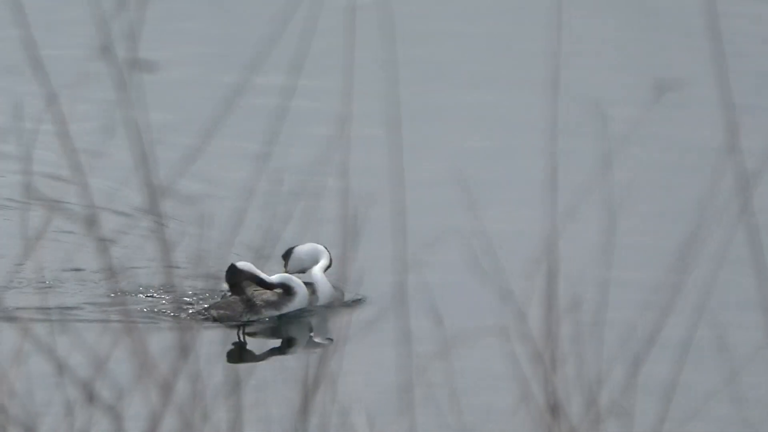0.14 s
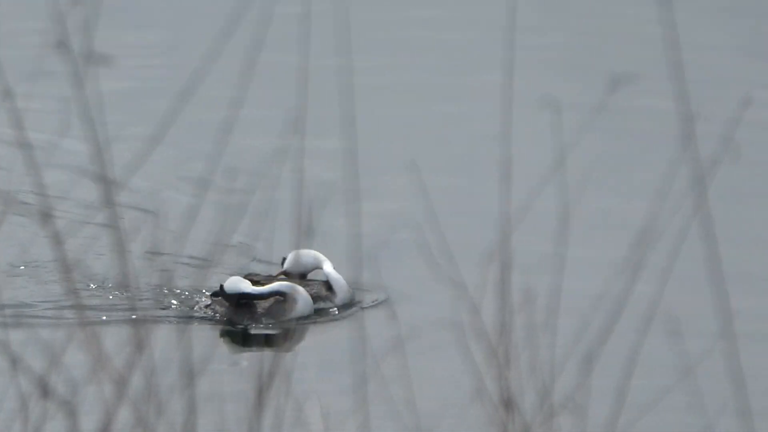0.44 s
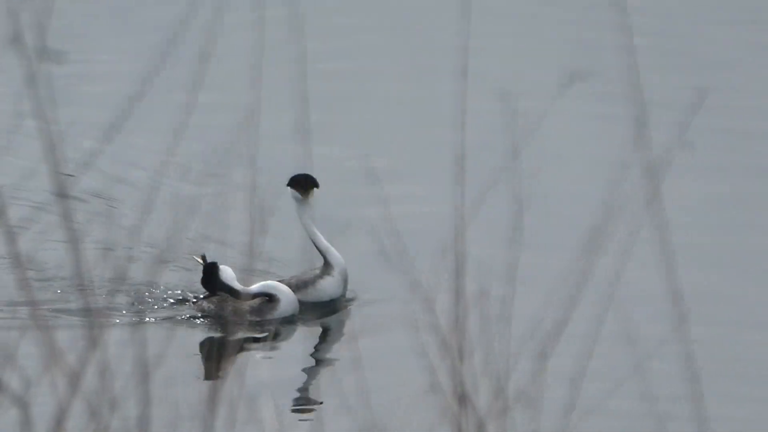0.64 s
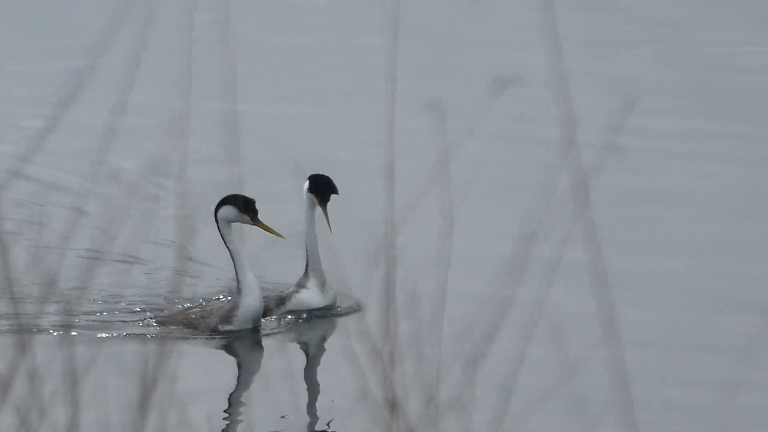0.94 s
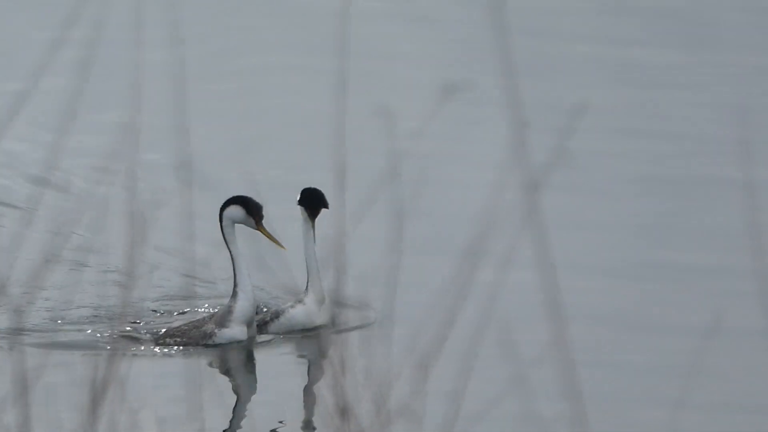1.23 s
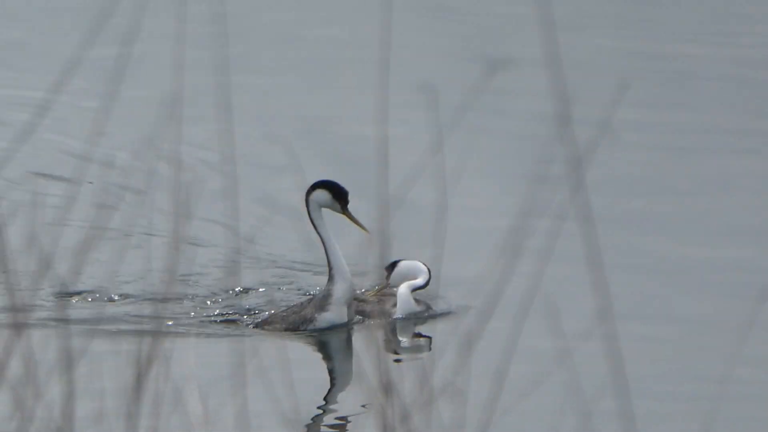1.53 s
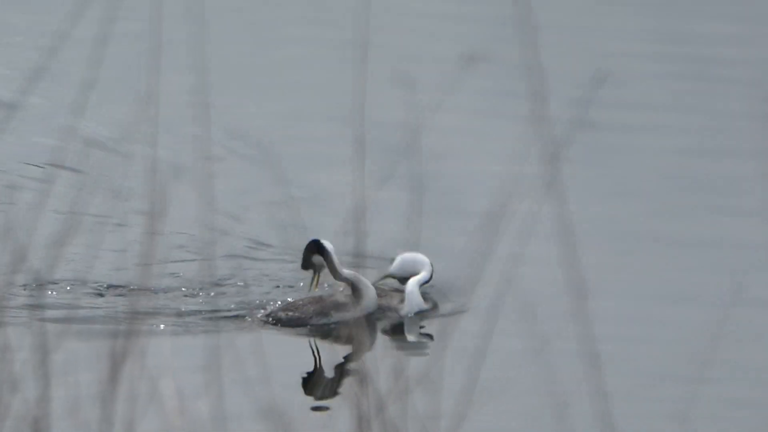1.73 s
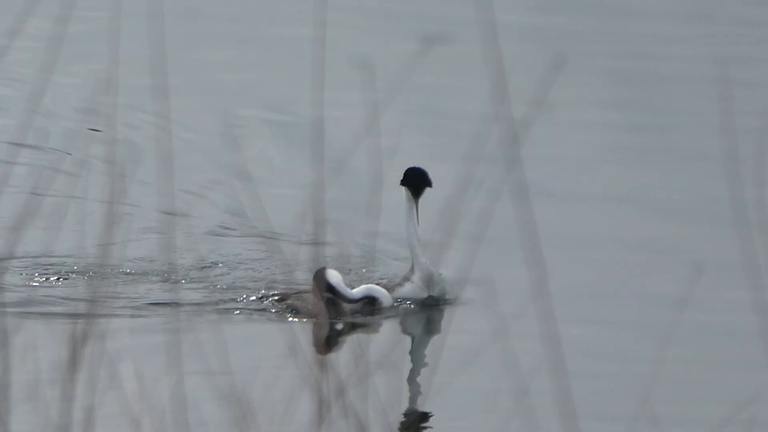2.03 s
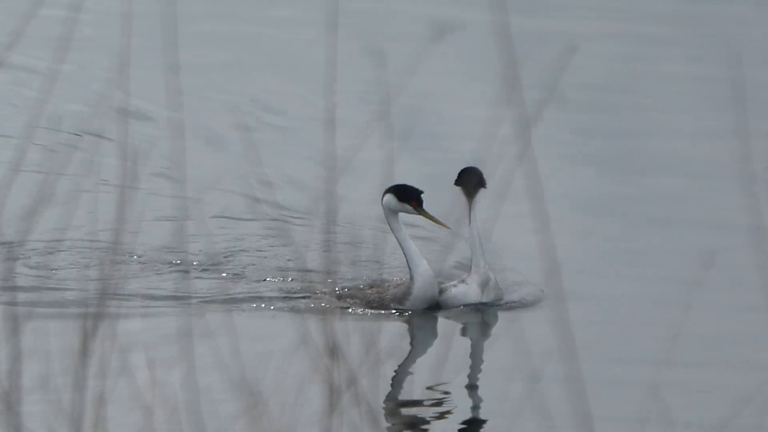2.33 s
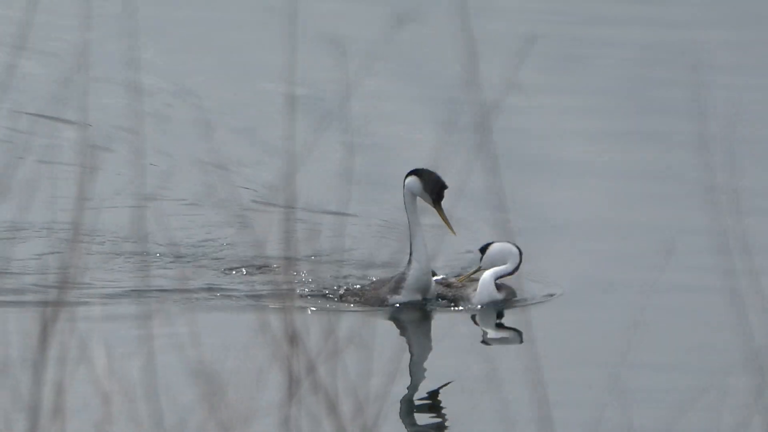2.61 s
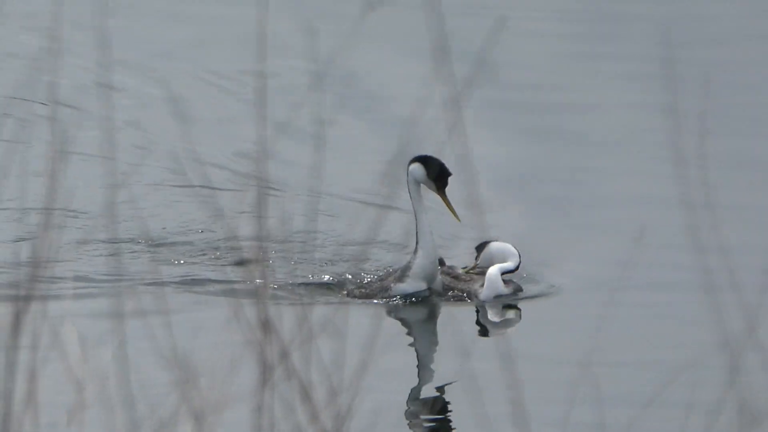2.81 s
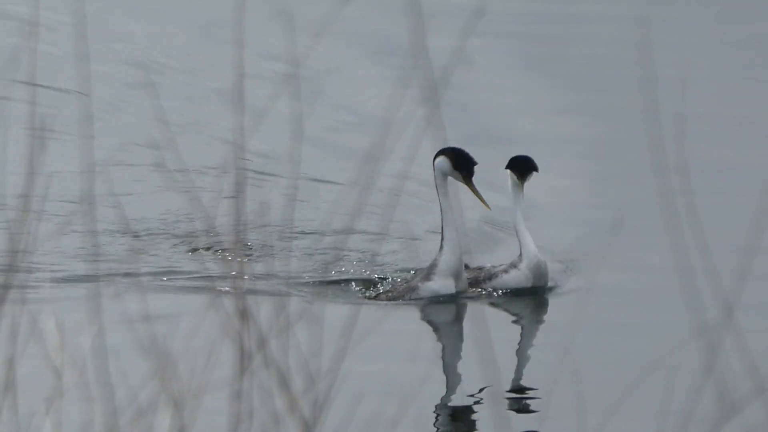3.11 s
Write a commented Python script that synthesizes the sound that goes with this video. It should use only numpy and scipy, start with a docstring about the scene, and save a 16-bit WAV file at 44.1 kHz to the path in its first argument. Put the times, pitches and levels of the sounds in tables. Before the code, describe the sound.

A grebe calls on a calm pond: dry ticks from 0.6 seconds quicken into a raspy, fluttering trill at 0.85, merging into a thin squeal until 1.4. More ticks follow around 1.5 and 2.7. Soft splashes come about twice a second, with sharp water slaps near 0.5 and 2.1. A distant rumble and faint hiss continue throughout, and a tiny far bird chirps twice around 2.8.

```python
"""Grebes courting on a calm pond.

A bird on the left ticks, speeds into a fluttering trill that merges into a thin squeal,
and ticks again. Its voice is a raspy whistle, shaped by the throat and echoed by the bank.
Soft splashy swishes come about twice a second, two with a sharp slap of water. Behind them
are a distant low rumble, faint open-air hiss and two chirps of a small far bird."""
import sys
import numpy as np
from scipy import signal
from scipy.fft import rfft, irfft
from scipy.io import wavfile

SR = 44100
rng = np.random.default_rng(int(sys.argv[2]) if len(sys.argv) > 2 else 0)


def to_wav(s):
    """Save 16-bit WAV."""
    ch = np.atleast_2d(s).T  # columns
    pcm = np.round(np.clip(ch, -1, 1) * 32767)  # PCM
    wavfile.write(sys.argv[1], SR, pcm.astype(np.int16))


N = 143766


def amp(db):
    """Decibels to gain."""
    return 10 ** (np.asarray(db) / 20)


def unit_rms(x):
    """Scales to rms 1."""
    return x / np.sqrt(np.mean(x ** 2) + 1e-20)


def curve_at(points, hz):
    """Interpolates (Hz, value) rows on a log-frequency axis."""
    point_hz, value = np.transpose(points)
    return np.interp(np.log(hz + 1), np.log(abs(point_hz) + 1), value)


def add(mix, start_s, sound):
    """Mixes a sound in at start_s."""
    part = mix[:, round(start_s * SR):][:, :sound.shape[1]]
    part += sound[:, :part.shape[1]]


def drift(size, cutoff_hz):
    """Low-passed random motion, rms about 1."""
    hz = np.fft.rfftfreq(size + 4096, 1 / SR)
    white = rfft(rng.standard_normal(size + 4096))
    return unit_rms(irfft(white * np.exp(-(hz / cutoff_hz) ** 2)))[:size]


# Each row: frequency in Hz, left-right correlation.
CORRELATION = [(60, 0.37), (130, 0.96), (290, 0.82), (640, 0.18), (1410, 0.034), (3100, 0.24), (6820, 0.47),
               (15000, 0.49)]
# Each row: frequency in Hz, left minus right in dB.
BALANCE = [(60, -1.5), (150, 0.5), (380, 1.5), (950, 2.0), (2380, 3), (5980, 0), (15000, -2.5)]


def outdoor_noise(spectrum, weight=lambda hz: 1):
    """Coloured stereo noise of rms 1, nearly mono in the upper bass."""
    hz = np.fft.rfftfreq(N, 1 / SR)
    left, independent = rfft(rng.standard_normal((2, N)))
    correlation = np.clip(curve_at(CORRELATION, hz), -1, 1)
    right = correlation * left + np.sqrt(1 - correlation ** 2) * independent
    lean_db = curve_at(BALANCE, hz) / 2
    pair = np.array([left * amp(lean_db), right * amp(-lean_db)])
    return unit_rms(irfft(pair * amp(curve_at(spectrum, hz)) * weight(hz), N))


# Each row: frequency in Hz, relative density in dB.
AIR_SPECTRUM = [(240, -23.5), (400, -5.5), (467, -8), (654, -6), (947, -12.5), (1020, -10.5), (1120, -14.5),
                (1310, -17), (1700, -19.5), (2170, -17), (2870, -30.5), (3340, -22), (4550, -30),
                (4980, -30), (10100, -34.5), (14600, -41), (15800, -49)]


def air(level_db=-50, swell_db=0.093):
    """Open-air hiss, almost steady."""
    return outdoor_noise(AIR_SPECTRUM) * amp(level_db + swell_db * drift(N, 13))


# Each row: frequency in Hz, relative density in dB.
RUMBLE_SPECTRUM = [(20, -56), (37, -46), (52, -28), (75, -16.5), (100, -12.5), (123, -4), (150, -1),
                   (170, 2), (209, -11.5), (240, -1.5), (267, 0), (306, -6), (341, -15), (391, -14.5),
                   (442, -22), (520, -28.5), (680, -33.5), (1140, -100)]
# Each row: time in seconds, low band in dB, upper band in dB.
RUMBLE_SWELLS = [(0, -44.5, -35), (.22, -43, -38), (.5, -44, -44), (0.751, -46, -44), (.9, -42.5, -48),
                 (1.15, -43, -41), (1.42, -41, -38), (1.55, -39.5, -44.5), (1.78, -46.5, -41.5),
                 (1.92, -41.5, -51), (2.2, -46, -48.5), (2.36, -46, -45.5), (2.65, -46, -49.5),
                 (2.98, -43.5, -47), (3.26, -47, -54)]


def rumble(crossover_hz=210):
    """A distant drone in two bands that swell separately."""
    def low_share(hz):
        return 1 / (1 + (hz / crossover_hz) ** 20)

    t = np.arange(N) / SR
    times, low_db, upper_db = np.transpose(RUMBLE_SWELLS)
    low = outdoor_noise(RUMBLE_SPECTRUM, lambda hz: np.sqrt(low_share(hz)))
    upper = outdoor_noise(RUMBLE_SPECTRUM, lambda hz: np.sqrt(1 - low_share(hz)))
    return low * amp(np.interp(t, times, low_db)) + upper * amp(np.interp(t, times, upper_db))


# Each row: start in seconds, length in seconds, first pitch in Hz, last pitch in Hz.
FAR_GLIDES = [(2.785, 0.056, 4570, 4040), (2.923, 0.048, 4200, 4580)]


def far_bird(level_db=-67):
    """A small distant bird whistles faint, pure glides."""
    out = np.zeros((2, N))
    for start_s, length_s, from_hz, to_hz in FAR_GLIDES:
        progress = np.arange(0, length_s, 1 / SR) / length_s
        glide = np.sin(2 * np.pi * np.cumsum(from_hz + (to_hz - from_hz) * progress) / SR)
        add(out, start_s, amp(level_db) * (np.sin(np.pi * progress) * glide)[None])
    return out


# Each row: peak time in seconds, half-width in seconds, level in dB, spray trim in dB.
SPLASHES = [(.458, 0.053, -46.5, -7), (1.029, 0.064, -55.5, -3), (1.549, 0.063, -51, -7),
            (2.057, 0.021, -45.5, -14), (2.098, 0.021, -46.5, -12), (2.648, 0.042, -43, -9),
            (3.165, 0.06, -51, -19)]
# Splash body and spray. Each row: frequency in Hz, relative density in dB.
BODY_SPECTRUM = [(200, -42), (600, 4), (1200, 2), (1800, 1), (2800, -17.5), (3900, -11.5), (6000, -51),
                 (16000, -64)]
SPRAY_SPECTRUM = [(2000, -21), (3300, -8), (4200, 3), (5500, 2.5), (7000, -35), (16000, -35)]
WATER_RIGHT_DB = -1.5


def swishes(graininess=0.33, spray_db=-10):
    """Grainy splashes swell and fade, each with more or less bright spray."""
    t, hz = np.arange(N) / SR, np.fft.rfftfreq(N, 1 / SR)
    grains = rfft(rng.standard_normal((2, N)) * np.exp(graininess * drift(N, 150)))
    body = unit_rms(irfft(grains * amp(curve_at(BODY_SPECTRUM, hz)), N))
    spray = unit_rms(irfft(grains * amp(curve_at(SPRAY_SPECTRUM, hz)), N))
    out = np.zeros((2, N))
    for peak_s, half_width_s, db, trim_db in SPLASHES:
        swell = np.exp(-abs((t - peak_s) / half_width_s) ** 2.6)
        out += amp(db) * swell * (body + amp(spray_db + trim_db) * spray)
    return out * amp([[0], [WATER_RIGHT_DB]])


def strike(t, rise_s):
    """Envelope that reaches 1 at rise_s and dies quickly."""
    return (t / rise_s * np.exp(1 - t / rise_s)) ** 2


# Each row: start in seconds, level in dB, pitch in Hz.
WATER_SLAPS = [(0.4742, -30, 1220), (2.0885, -31.5, 1250)]


def slaps(rise_s=0.00038):
    """Sharp slaps of water inside the swishes: knocks of a few cycles."""
    out, t = np.zeros((2, N)), np.arange(512) / SR
    for start_s, db, hz in WATER_SLAPS:
        knock = strike(t, rise_s) * np.sin(2 * np.pi * hz * t)
        add(out, start_s, amp([[db], [db + WATER_RIGHT_DB]]) * knock)
    return out


def bank_echo(call, level_db=-16, t60_s=0.32):
    """A faint, diffuse return from the reeds and the bank."""
    t = np.arange(SR // 2) / SR
    tail = rng.standard_normal((2, len(t))) * amp(-60 * t / t60_s)
    tail /= np.linalg.norm(tail[0])
    return amp(level_db) * signal.fftconvolve(call[:1], tail, axes=1)[:, :N]


# Each row: frequency in Hz, gain in dB.
THROAT_RESPONSE = [(1200, 8.5), (1800, -0.5), (2300, -0.5), (2580, 0.5), (2900, -9.5), (3150, -3),
                   (3450, 5.5), (3900, 3), (4300, 0.5), (4560, 0.5), (4900, 2), (5700, 3), (6400, -1),
                   (8000, -4)]


def throat(source, ring_hz=2420, ring_width_hz=310, ring_db=-9):
    """Two broad resonances with a deep valley between, and a narrow one that rings after each pulse."""
    ring = signal.lfilter(*signal.iirpeak(ring_hz, ring_hz / ring_width_hz, fs=SR), source)
    response = amp(curve_at(THROAT_RESPONSE, np.fft.rfftfreq(N, 1 / SR)))
    return irfft(rfft(source + amp(ring_db) * ring) * response, N)


# Each entry: multiple of the pitch.
PARTIAL_RATIOS = [1, 1.5, 2, 3]
# Each row: dB in the squeal, dB in chirps, dB in ticks, right-side offset in dB.
PARTIAL_GAINS = [(-1, 3, 3.5, -16), (-35, -34, -16.5, -18), (-15.5, -22, -9.5, -8), (-37, -31, -26, -12.5)]
IN_SQUEAL, IN_CHIRPS, IN_TICKS = range(3)


def voice(hz, envelope, column, overtone_db=0, split_db=0, rasp_db=-24, waver=0.0077):
    """The grebe's raspy whistle; split_db lifts the partial between the first two harmonics."""
    size = len(hz)
    phase = 2 * np.pi * np.cumsum(hz * (1 + waver * drift(size, 400))) / SR
    out = np.zeros((2, size))
    for ratio, (*gains_db, right_db) in zip(PARTIAL_RATIOS, PARTIAL_GAINS):
        rasp = 1 + amp(rasp_db) * (drift(size, 600) + 1j * drift(size, 600))
        db = gains_db[column] + overtone_db * (ratio > 1) + split_db * (ratio % 1 > 0)
        partial = (envelope * rasp * np.exp(1j * ratio * phase)).imag
        out += amp([[0], [right_db]]) * amp(db) * partial
    return out


def edges(t, fade_s=0.0021):
    """Linear fades at both ends."""
    return np.clip(np.minimum(t, t[-1] - t) / fade_s, 0, 1)


# Each row: start in seconds, source level in dB, pitch in Hz, overtone trim in dB.
GREBE_TICKS = [(0.603, -37, 1980, 2.5), (0.635, -36.5, 2110, 1), (0.649, -41, 2140, 2),
               (0.6725, -33.5, 2140, -1), (0.687, -35, 2200, -4), (0.726, -32, 2065, -0.5),
               (.742, -50, 2210, -3), (1.335, -47, 1850, 5), (1.403, -31.5, 2110, -1.5),
               (1.4422, -33.5, 2090, 3.5), (1.491, -38, 1835, 1), (1.495, -34, 2020, 1.5),
               (1.501, -32.5, 2190, 0), (2.682, -39.5, 2090, -16), (2.7306, -35, 2060, -18),
               (2.7403, -39.5, 2140, -15)]


def ticks(rise_s=0.0014, glide_per_s=10):
    """Dry single pulses of the voice, rising in pitch and rougher than the notes."""
    out, t = np.zeros((2, N)), np.arange(512) / SR
    for start_s, db, hz, overtone_db in GREBE_TICKS:
        pitch_hz = hz * (1 + glide_per_s * (t - rise_s))
        envelope = amp(db) * strike(t, rise_s)
        add(out, start_s, voice(pitch_hz, envelope, IN_TICKS, overtone_db, rasp_db=-13))
    return out


def flutter(size, rate_hz, jitter=0.14, first_pulse_s=0.0019, width_cycles=0.18, floor=0.035):
    """Complex envelope of pulses and weaker after-pulses; shifts every partial up by the pulse rate."""
    cycles = np.cumsum(rate_hz * (1 + jitter * drift(size, 114))) / SR - first_pulse_s * rate_hz
    pulses = np.exp(-(((cycles + 0.5) % 1 - 0.5) / width_cycles) ** 2)
    after_pulses = 0.33 * np.exp(-((cycles % 1 - 0.5) / width_cycles) ** 2)
    return (floor + pulses + after_pulses) * np.exp(2j * np.pi * cycles)


# Each row: start in seconds, length in seconds, source level in dB, base pitch in Hz,
# pulse rate in Hz, fraction by which the base pitch starts flat.
TRILL_CHIRPS = [(0.8487, 0.021, -26.5, 2165, 178, 0.0058), (0.893, 0.01, -26.5, 2145, 210, 0.12),
                (0.938, .015, -26.5, 2164, 173, 0.16), (0.964, 0.014, -31, 1920, 150, -0.09),
                (.9848, .014, -23, 2210, 160, 0.08), (1.013, .014, -35, 1890, 155, -.05),
                (1.0313, 0.022, -26, 2207, 148, 0.23), (1.062, .014, -38, 2040, 136, 0.024),
                (1.079, 0.016, -36.5, 2200, 210, 0), (1.1098, 0.0073, -26.5, 2130, 200, .1),
                (1.1195, 0.021, -27, 2245, 123, 0.14), (1.172, 0.04, -24, 2200, 175, .02),
                (1.2183, 0.041, -26.5, 2173, 141, 0.095), (1.266, .034, -28, 2190, 170, 0.043),
                (1.363, 0.018, -25, 2240, 164, .15), (2.909, 0.014, -37, 2020, 170, 0.054)]


def trill(swell_s=0.0072, swell_db_per_s=900, fade_db=8.5, scoop_s=0.00393, swing=0.015):
    """Fluttering chirps that swell, slide onto an unsteady pitch and fade."""
    out = np.zeros((2, N))
    for start_s, length_s, db, base_hz, rate_hz, scoop in TRILL_CHIRPS:
        t = np.arange(0, length_s, 1 / SR)
        dip_db = np.maximum(swell_s - t, 0) * swell_db_per_s + fade_db * (t / length_s) ** 3
        envelope = amp(db - dip_db) * edges(t) * flutter(len(t), rate_hz)
        hz = base_hz * (1 - scoop * np.exp(-t / scoop_s))
        hz *= 1 + swing * drift(len(t), 370)
        add(out, start_s, voice(hz, envelope, IN_CHIRPS))
    return out


# Each row: time in seconds, pitch in Hz, source level in dB, overtone trim in dB.
SQUEAL_CONTOUR = [(1.147, 2170, -33, -2), (1.152, 2104, -33, 2.5), (1.166, 2001, -34, -4),
                  (1.181, 2135, -39, 5), (1.193, 2157, -42, -4), (1.203, 2160, -30, 6.5),
                  (1.217, 2023, -37, -6), (1.229, 2137, -34, 7), (1.238, 2160, -34, 8.5),
                  (1.265, 2060, -34.5, -2), (1.276, 2153, -29.5, 4.5), (1.304, 2168, -27, 3),
                  (1.313, 2072, -33.5, 5), (1.327, 2103, -28.5, -2), (1.344, 2093, -28.5, 2),
                  (1.363, 2053, -33, -3), (1.369, 2140, -29.5, 7), (1.375, 2130, -46, 0)]


def squeal(ripple_db=1.4, split_at_s=1.335, split_half_width_s=0.023, split_peak_db=17):
    """One thin, drawn-out note under the end of the trill; late in it the voice splits."""
    out = np.zeros((2, N))
    times, *columns = np.transpose(sorted(SQUEAL_CONTOUR))
    start_s = times[0]
    t = np.arange(0, times[-1] - start_s, 1 / SR)
    hz, db, overtone_db = (np.interp(t + start_s, times, column) for column in columns)
    split_db = split_peak_db * np.exp(-((t + start_s - split_at_s) / split_half_width_s) ** 2)
    envelope = edges(t) * amp(db + ripple_db * drift(len(t), 250))
    add(out, start_s, voice(hz, envelope, IN_SQUEAL, overtone_db, split_db))
    return out


def scene():
    """The grebe, its echo and the pond around it."""
    call = throat(ticks() + trill() + squeal())
    return call + bank_echo(call) + swishes() + slaps() + far_bird() + rumble() + air()


def record(dry):
    """Soft ends and a 15.7 kHz band limit."""
    ends = np.sin(np.pi / 2 * edges(np.arange(N) / SR, fade_s=0.004)) ** 2
    lowpass = signal.firwin(511, 15700, window=("kaiser", 9), fs=SR)
    return signal.oaconvolve(dry * ends, lowpass[None], "same")


dry = scene()
out = record(dry)
to_wav(out)
```